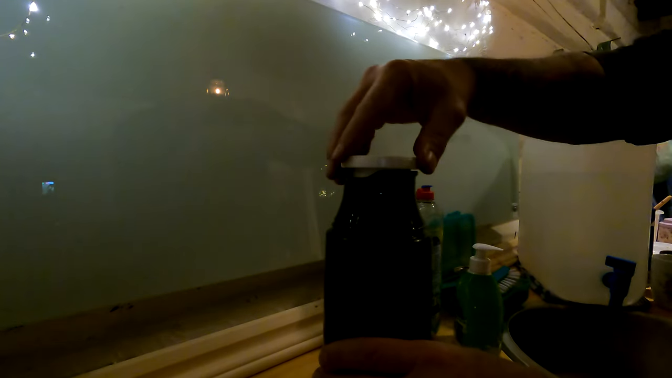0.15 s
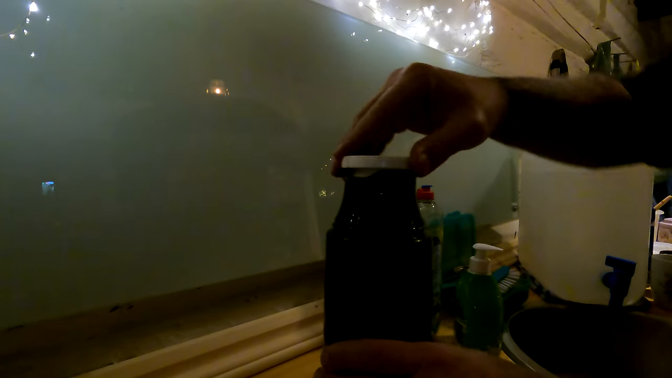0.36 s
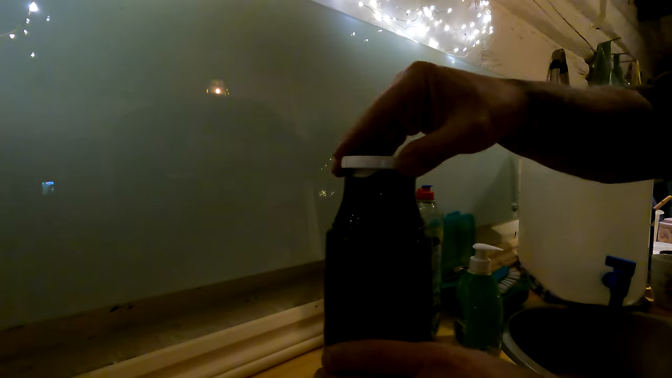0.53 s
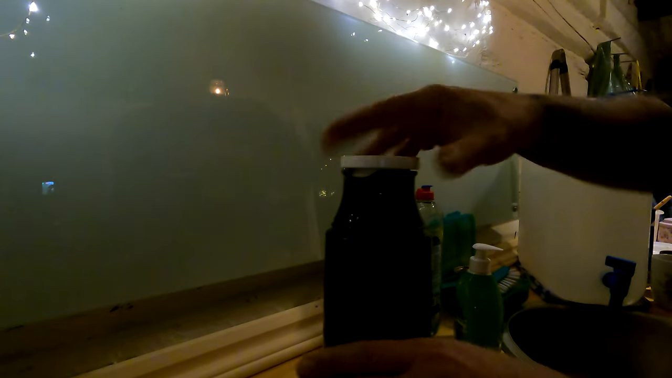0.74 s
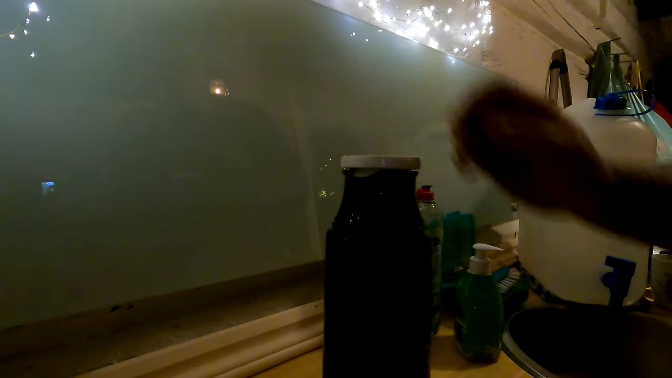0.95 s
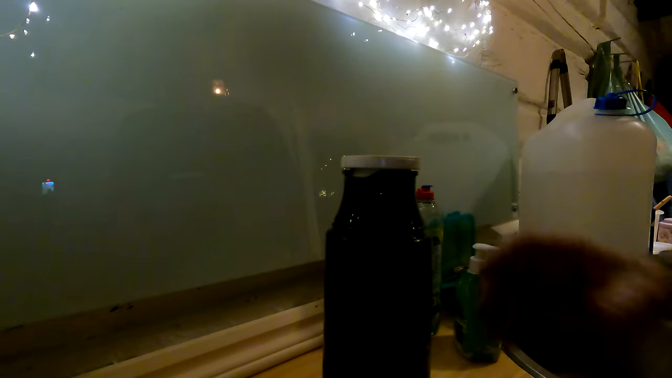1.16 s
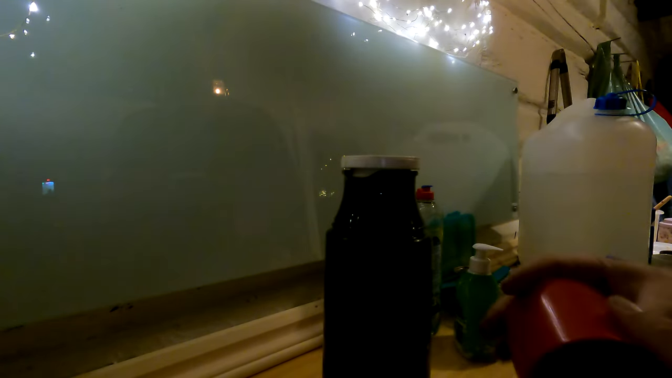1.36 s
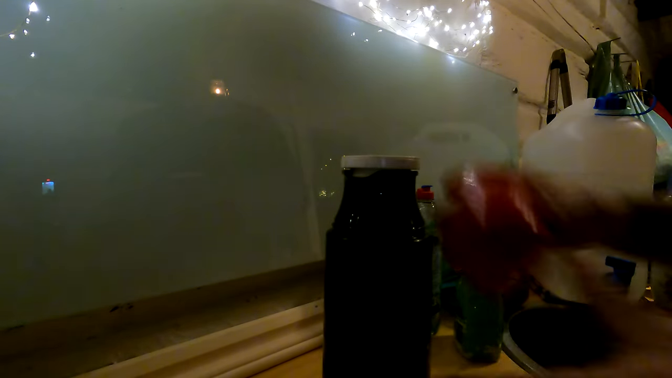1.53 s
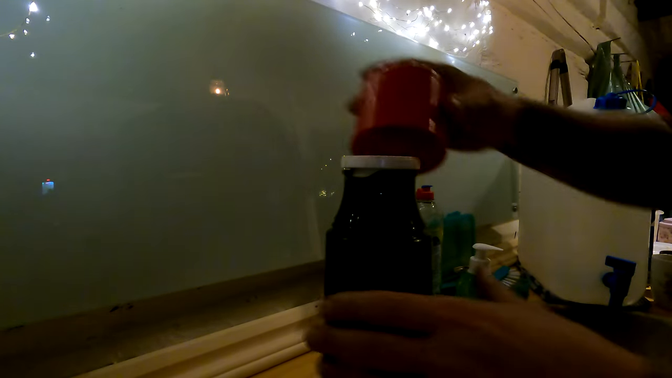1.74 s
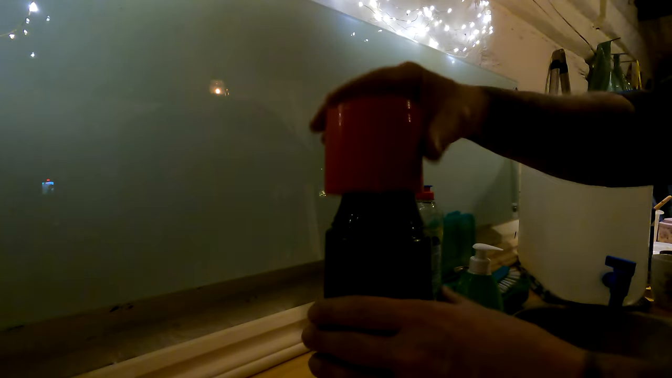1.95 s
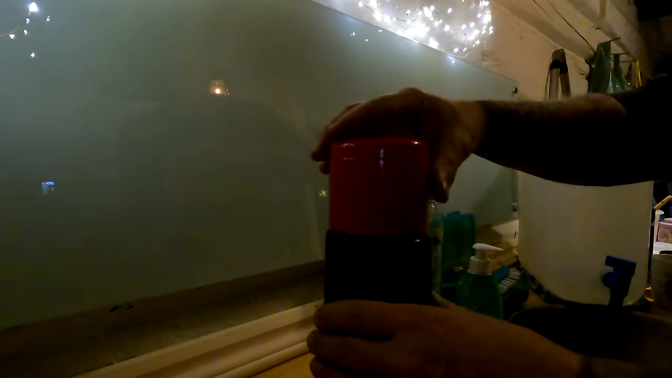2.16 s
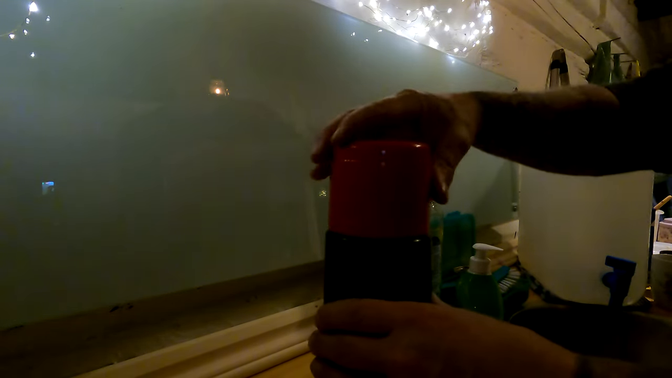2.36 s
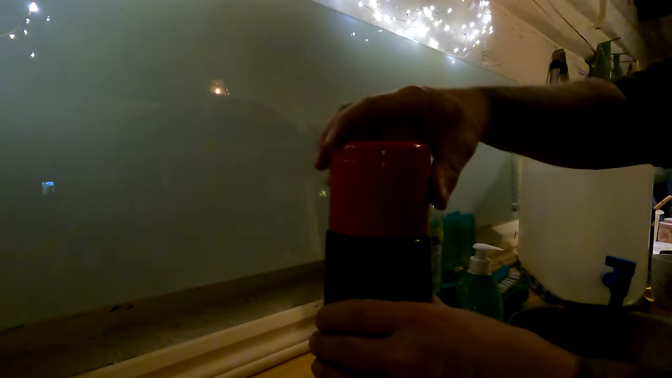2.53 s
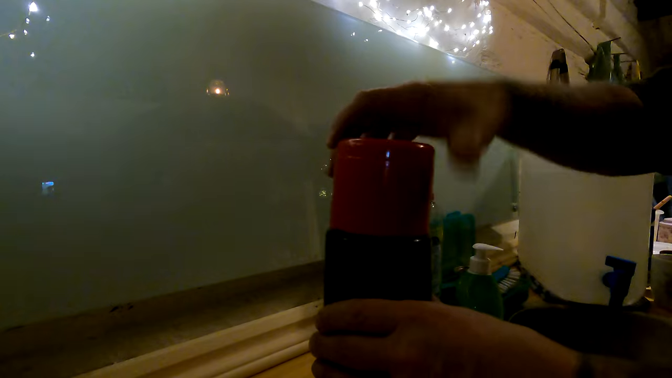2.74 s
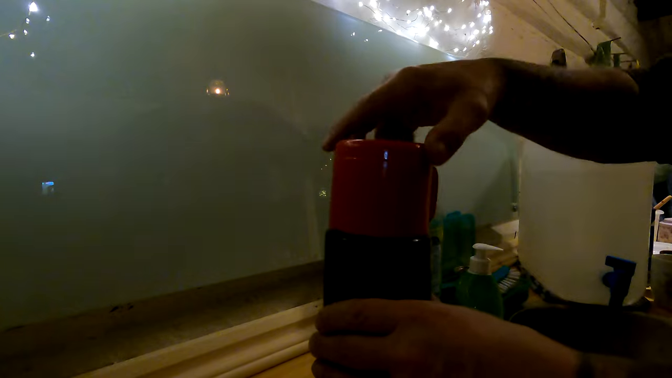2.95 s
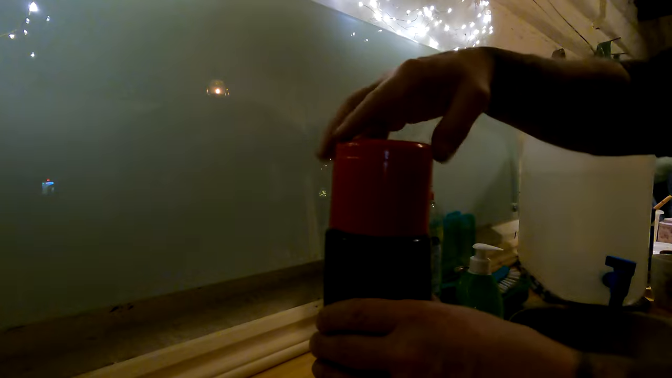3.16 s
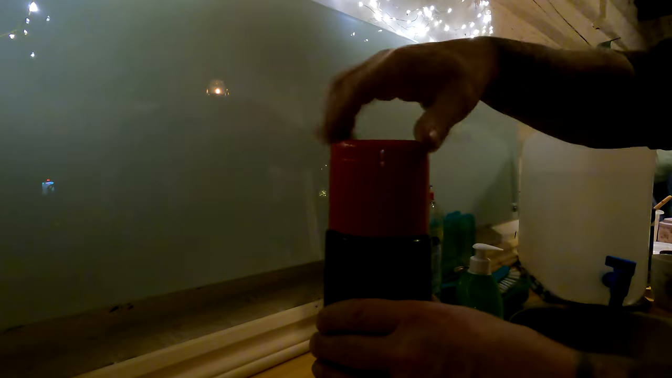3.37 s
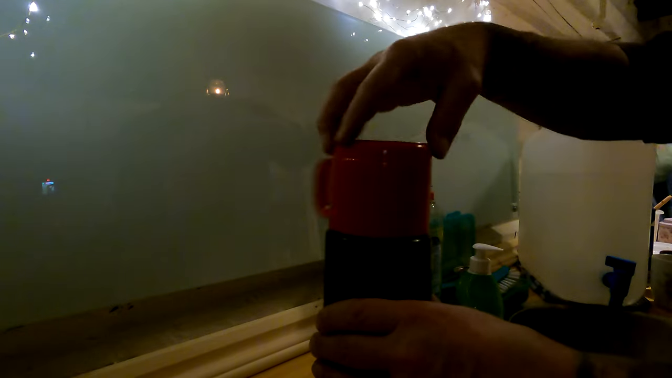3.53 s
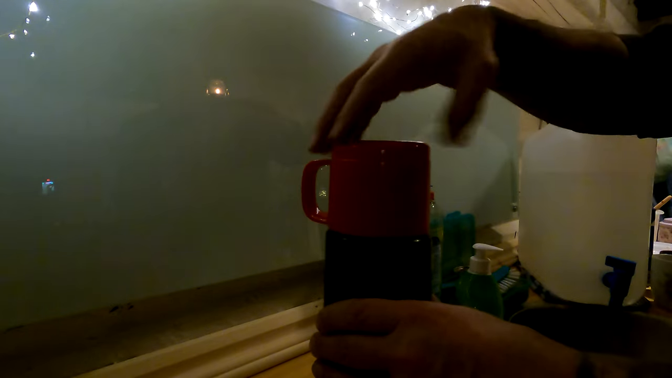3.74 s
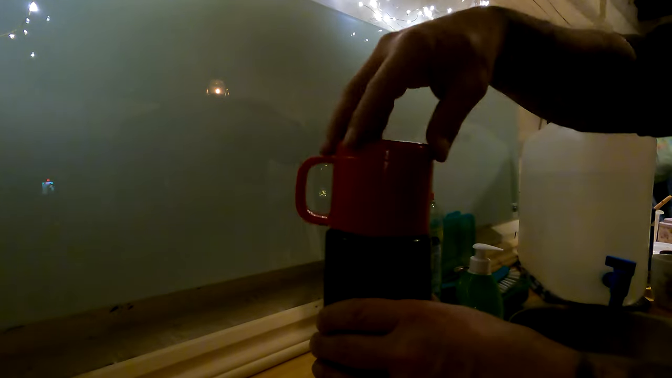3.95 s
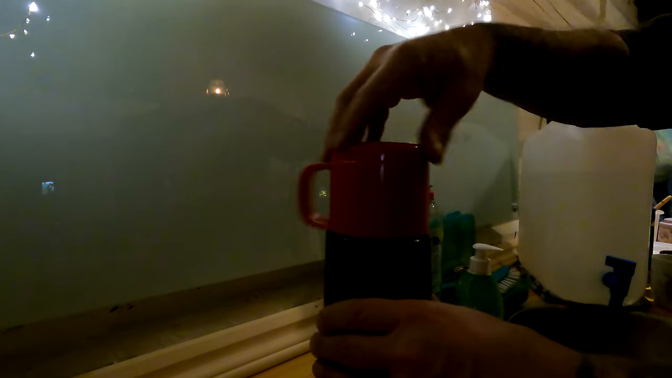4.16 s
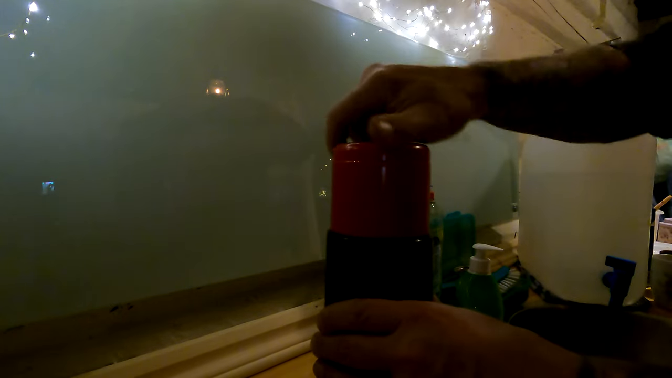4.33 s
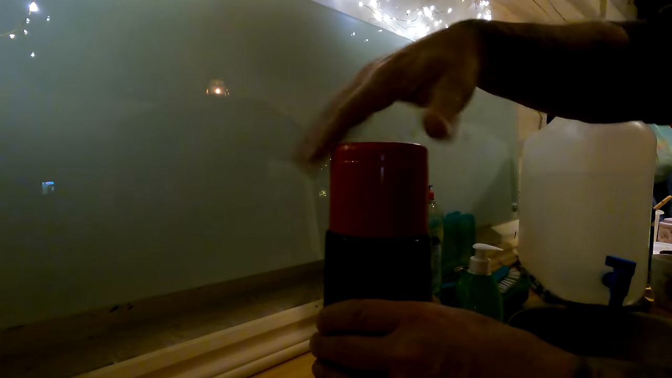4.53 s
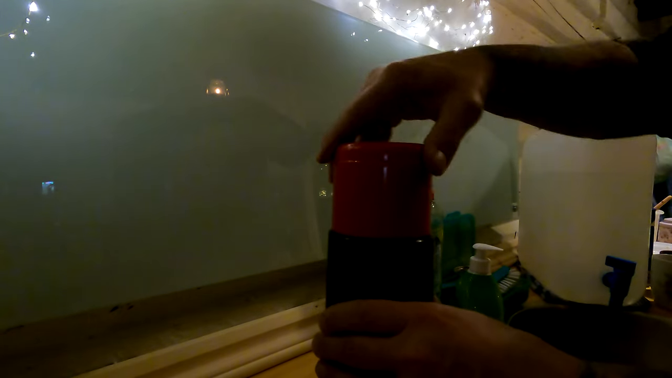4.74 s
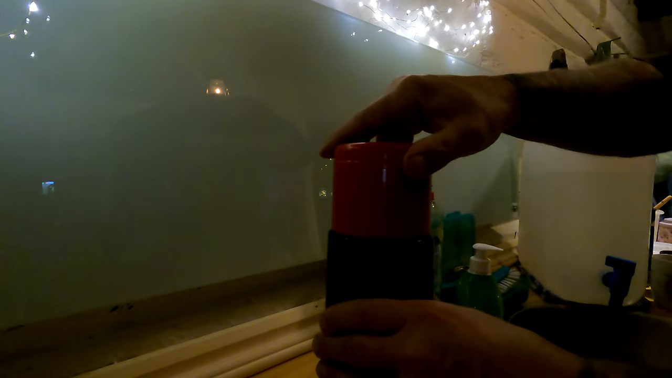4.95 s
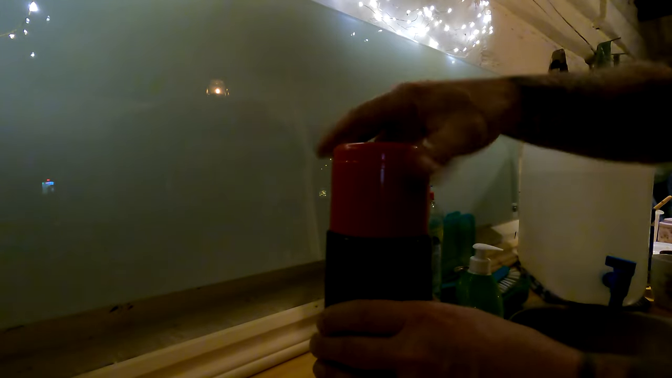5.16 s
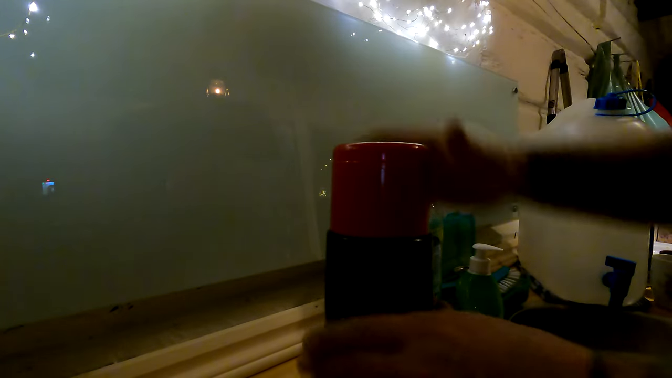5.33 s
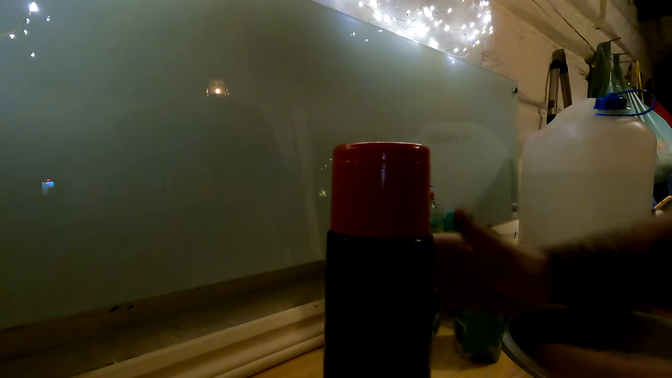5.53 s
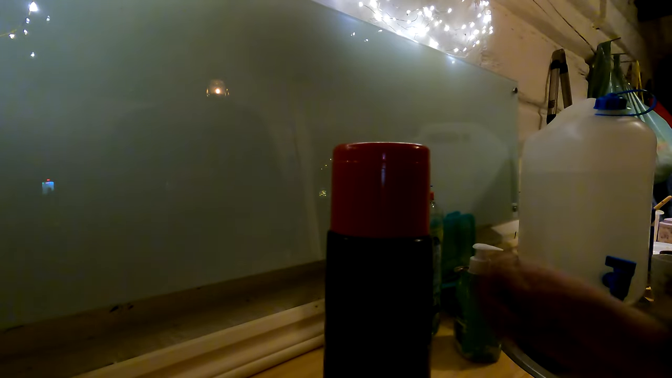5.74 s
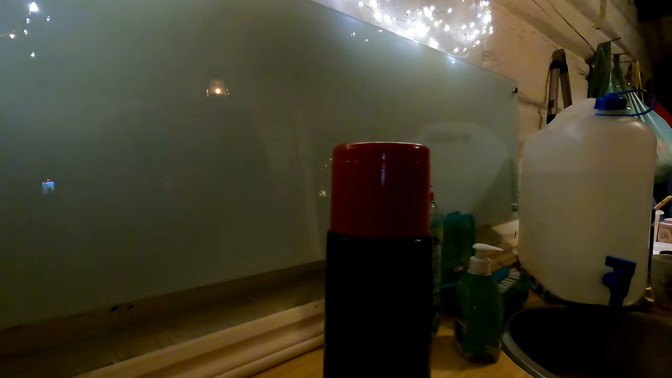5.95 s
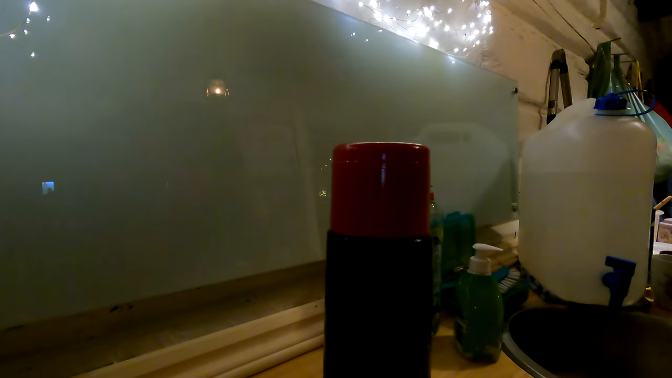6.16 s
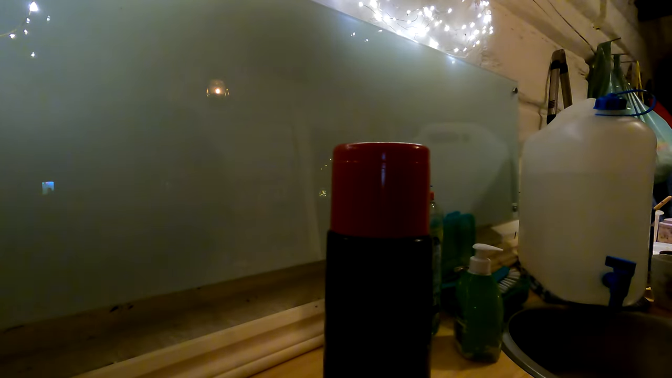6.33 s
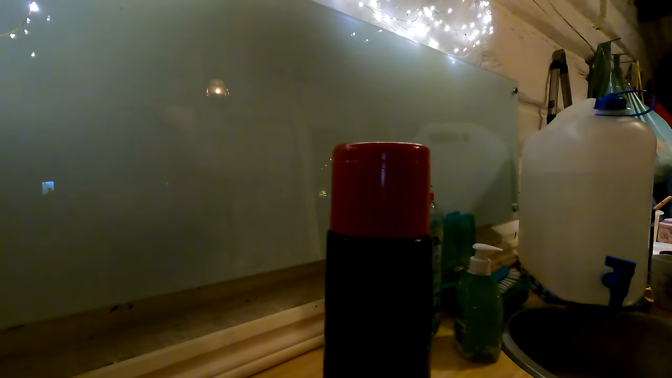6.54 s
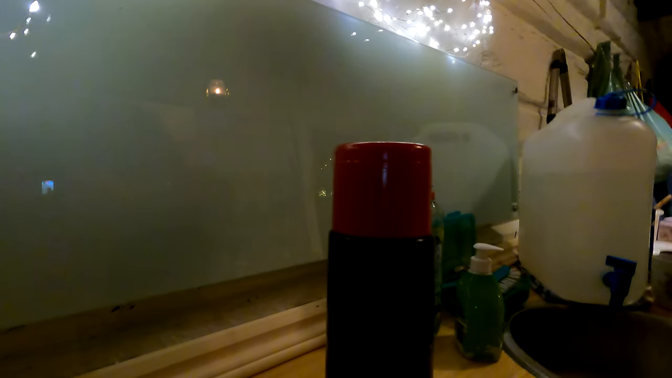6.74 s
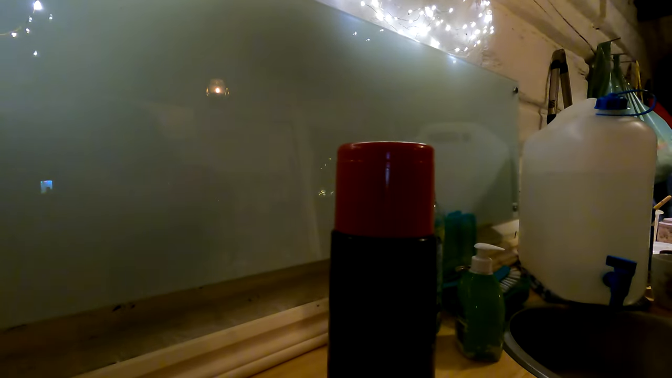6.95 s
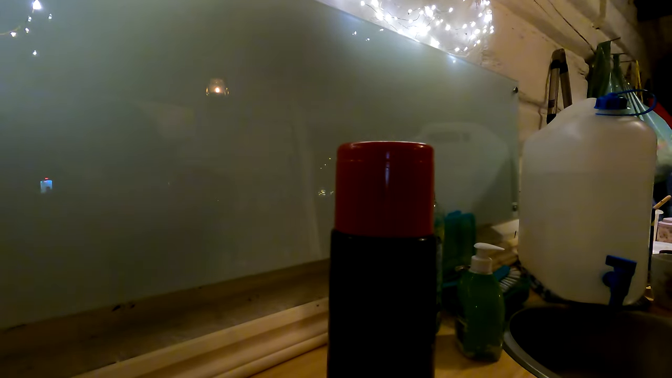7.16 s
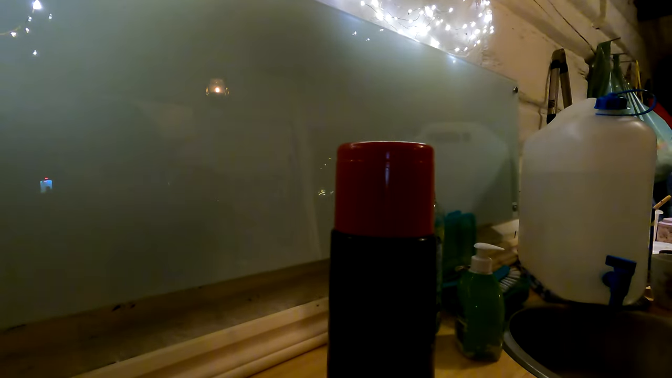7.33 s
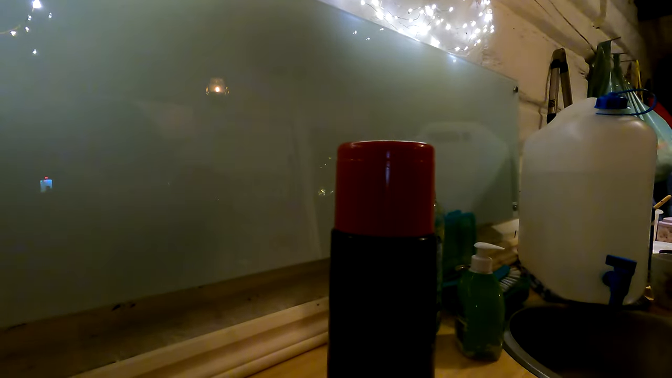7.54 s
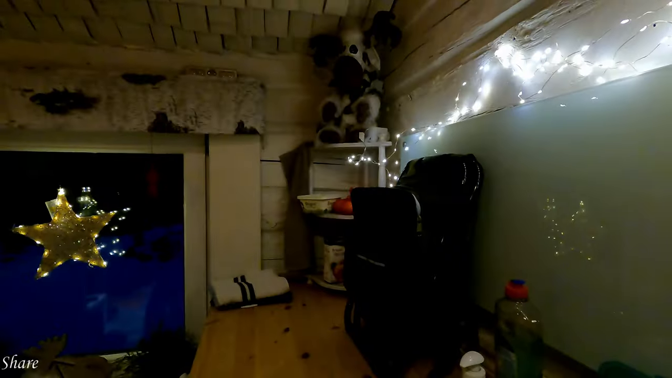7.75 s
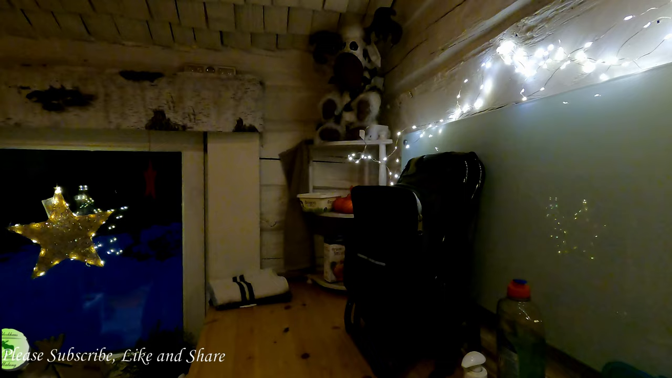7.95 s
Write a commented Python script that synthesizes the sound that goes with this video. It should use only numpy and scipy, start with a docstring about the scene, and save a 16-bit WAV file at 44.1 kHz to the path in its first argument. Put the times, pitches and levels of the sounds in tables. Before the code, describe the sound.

A faint rubbery rub and soft skin brushes come first as a stopper is tightened. A hollow plastic cup then lands with a rattling cluster of knocks and is twisted on in short gritty scrapes, the loudest clacks midway. Low thumps travel through the counter to a close stereo microphone. Afterwards come dull bumps, a humming finger on the microphone's housing, and a brief silence.

```python
"""A plastic cup is screwed onto a vacuum flask on a kitchen counter, after fingers tighten the stopper.
Cup knocks are a short wall swing, ringing modes, chatter and a crack; the thread scrapes in noisy slips.
Knocks and pushes also reach a microphone on the counter as low thumps made of decaying sine waves.
Bumps of filtered noise, and a finger humming and hissing on the microphone's housing, come as well.
Noise gives the room rumble and hiss; a short silence falls just before the end."""
import sys
import numpy as np
from scipy import signal
from scipy.fft import rfft, irfft, next_fast_len
from scipy.io import wavfile
from scipy.ndimage import uniform_filter1d

SR = 44100
rng = np.random.default_rng(int(sys.argv[2]) if len(sys.argv) > 2 else 0)


def transcribe(signal):
    """Save signal, clipped to [-1, 1], as a 16-bit WAV file at the path in sys.argv[1]."""
    frames = np.atleast_2d(signal).T
    limited = np.clip(frames, -1, 1)
    pcm = np.round(limited * 32767).astype(np.int16)
    wavfile.write(sys.argv[1], SR, pcm)


N = 352344
T = np.arange(N) / SR  # time in seconds
RING_T = T[:SR // 2]  # the half second allowed for each blow

# Blows on the cup and the stopper, and a click (at 7.453 s) as a finger meets the microphone's housing.
# Each row: start in seconds, body level in dB, wall swing in Hz, crack level in dB,
# level in dB of the thud through the counter.
KNOCKS = [(0.808, -22.5, 630, -39, -17.5), (1.097, -35.5, 540, -76, -44), (1.469, -54, 860, -59, -43.5),
          (1.52, -46, 890, -77, -63), (1.67, -47.5, 864, -60.5, -60), (2.023, -22.5, 950, -43.5, -31.5),
          (2.157, -14.5, 805, -29.5, -39), (2.163, -0.5, 787, -32, -20.5), (2.176, -10, 960, -32, -22),
          (2.186, -7, 620, -27.5, -30.5), (2.321, -2.5, 859, -43, -17), (2.584, -34, 520, -61.5, -30),
          (2.793, -5.5, 920, -40.5, -17), (2.845, -13.5, 880, -59, -25.5), (2.894, -9.5, 692, -38.5, -26),
          (2.974, -18.5, 670, -50, -37), (2.994, -18, 363, -55, -39), (3.112, -33.5, 600, -58, -62),
          (3.126, -27, 342, -56, -39), (3.161, -13, 345, -53, -36.5), (3.177, -11.5, 382, -38, -17.5),
          (3.276, -24, 650, -47, -42), (3.284, -12.5, 964, -41, -33), (3.293, -18.5, 372, -46.5, -35),
          (3.469, -31, 700, -58, -32), (3.511, -3.5, 690, -55, -19.5), (3.623, -15, 880, -54, -17),
          (3.716, -8, 732, -34, -26), (3.937, 3, 877, -22, -16), (3.944, -2, 1030, -33.5, -3.5),
          (4.002, -15.5, 676, -38, -26), (4.075, -12.5, 784, -44.5, -33), (4.1, 4.5, 1055, -18, -1),
          (4.268, -24, 650, -53, -38), (4.345, -22.5, 1300, -49, -34), (4.406, -26, 500, -47.5, -23.5),
          (4.479, -30, 1500, -54, -47), (4.505, -25.5, 1400, -47, -46), (4.54, -31.5, 1400, -54.5, -46),
          (4.906, -4, 1025, -34.5, -13.5), (4.934, 2, 974, -26.5, -6), (5.265, -34.5, 700, -58, -24),
          (5.291, -39, 1245, -52, -38), (5.328, -59, 1300, -59.5, -56), (5.407, -25, 635, -42.5, -30.5),
          (7.453, -60, 1400, -56, -70), (7.967, -38.5, 1170, -82.5, -48)]
# Twists of the cup along its thread. Each row: start in seconds, length in seconds, scrape level in dB.
TWISTS = [(1.994, 0.072, -52), (2.289, 0.09, -45), (2.585, 0.22, -40.5), (2.88, 0.091, -47.5),
          (3.106, 0.18, -44), (3.474, .28, -44.5), (3.916, 0.096, -36), (4.07, 0.09, -37.5),
          (4.235, 0.048, -33.5), (4.314, 0.072, -33), (4.899, 0.1, -39)]
# Ringing tones of the cup. Each row: pitch in Hz, level in dB, seconds to fall by 60 dB.
CUP_MODES = [(308, -9, .15), (334, -3.5, 0.044), (397.8, -2.5, .09), (529.5, -4, 0.14), (592.4, -5.5, 0.13),
             (700, 3, 0.055), (814, -9.5, 0.026), (937.6, 1.5, 0.12), (1026, -0.5, 0.09), (1093, -7, 0.1),
             (1255, -18.5, 0.091), (1373, -10.5, 0.13), (1754, -14.5, 0.057), (1732, -21, 0.25),
             (2060, -23, .2), (2270, -19.5, .08), (2310, -18, 0.083), (2551, -19.5, 0.033),
             (3079, -17.5, 0.033), (2960, -25, 0.04), (3607, -20, 0.069), (3820, -20.5, .08),
             (4240, -29.5, 0.037), (5000, -27, 0.058)]
# Tone colour of the low rumble under a hand. Each row: pitch in Hz, level in dB.
RUMBLE_COLOUR = [(20, -3.5), (45, 8.5), (75, 7.5), (110, -12.5), (180, -6.5), (260, -21.5), (450, -31),
                 (900, -64.5)]


def undb(db):
    """Turn decibels into a gain."""
    return 10 ** (np.asarray(db) / 20)


def unit(x, top=False):
    """Scale to an rms of 1, or to a peak of 1."""
    size = np.abs(x).max() if top else x.std()
    return x / size


def colour(x, points):
    """Filter with a response of (Hz, dB) points; it never sounds before its input."""
    size = next_fast_len(len(x) + 4096, True) // 2 * 2
    hz, db = np.transpose(points)
    f = np.maximum(np.arange(size // 2 + 1) * SR / size, 1)
    log_gain = np.interp(np.log(f), np.log(hz), db) * np.log(10) / 20
    # folding the cepstrum forward in time gives the filter its minimum phase
    cepstrum = irfft(log_gain)
    cepstrum[1:size // 2] *= 2
    cepstrum[size // 2 + 1:] = 0
    response = np.exp(rfft(cepstrum))
    return irfft(rfft(x, size) * response)[:len(x)]


def fade(t60):
    """Exponential decay after a blow, falling 60 dB in t60 seconds."""
    return undb(-60 * RING_T / max(t60, 1e-3))


def burst(t60):
    """Dying noise: many tiny contacts or wall reflections."""
    return rng.standard_normal(len(RING_T)) * fade(t60)


def ring(modes, scatter_db):
    """Decaying tones of a struck body; each blow lands elsewhere and weights them anew."""
    out = np.zeros(len(RING_T))
    for hz, db, t60 in modes:
        level_chance, pitch_chance = rng.uniform(-1, 1, 2)
        gain = undb(db + scatter_db * level_chance) * np.sign(pitch_chance)
        tone = np.sin(2 * np.pi * hz * (1 + 0.009 * pitch_chance) * RING_T)
        out += gain * fade(t60) * tone
    return out


def add(track, s, x):
    """Mix a sound into the track at time s in seconds."""
    i = max(int(s * SR), 0)
    track[..., i:i + x.shape[-1]] += x[..., :N - i]


def pan(x, db):
    """Place a sound by its left minus right level in dB."""
    return x * undb(np.array([[db], [-db]]) / 2)


def grains(rate, spread_db):
    """Stick-slip clicks of uneven size at a given rate per second, rms 1."""
    clicks = (rng.random(N) < rate / SR) * rng.standard_normal(N)
    return unit(clicks * undb(abs(spread_db) * rng.exponential(size=N)))


def walk(rate):
    """Random values at a given rate per second, held and smoothed; their spread is near 1."""
    k = int(SR / rate)
    steps = np.repeat(rng.standard_normal(N)[:N // k + 1], k)
    return unit(uniform_filter1d(steps, k)[:N])


def strokes(rows, attack_s, release_s):
    """Gain of (s, length s, dB) hand movements: each swells, holds, then falls 60 dB in the release."""
    out = np.zeros(N)
    for s, length_s, db in rows:
        t = T[T < length_s + release_s]
        swell = np.minimum(t / attack_s, 1) ** 2
        fall = np.exp(-np.log(1000) * np.maximum(t - length_s, 0) / release_s)
        add(out, s, swell * undb(db) * fall)
    return out


def knock(body_db, hz, crack_db, swing_cycles=7.2, rise_s=0.00059):
    """The gripped wall swings a few cycles, the cup rings and chatters on, the hard rim cracks."""
    # Tone colour of the chatter. Each row: pitch in Hz, level in dB.
    chatter_colour = [(100, -24.5), (250, -12.5), (500, -4), (950, 5.5), (1500, -3), (2500, -13),
                      (5000, -41.5), (12000, -58)]
    # Tone colour of the rim's crack. Each row: pitch in Hz, level in dB.
    crack_colour = [(300, -20), (900, 2), (2000, 7.5), (3600, 1.5), (5500, -1), (8000, -10.5), (12000, -23),
                    (16000, -28)]
    swing = np.sin(2 * np.pi * hz * RING_T) * fade(swing_cycles / hz)  # falls 60 dB in these cycles
    swing = unit(swing * (1 - np.exp(-RING_T / rise_s)), top=True)
    modes = unit(ring(CUP_MODES, scatter_db=5.5), top=True)
    chatter = unit(colour(burst(t60=0.044), chatter_colour), top=True)
    body = unit(swing + undb(-6.5) * modes + undb(-5.0) * chatter, top=True)

    crack = burst(t60=0.0065) + undb(-17.5) * burst(t60=0.047)
    crack = colour(crack * (1 - np.exp(-RING_T / 0.001)), crack_colour)
    crack *= undb(crack_db + 2.5) / crack[:SR // 50].std()  # level over the first 20 ms
    return undb(body_db + 0.6) * body + crack


def knocks(lag_s=0.0018, graze_db=-15, graze_t60_s=0.05):
    """Blows on cup and stopper, and a click on the housing; the parts graze just before they meet."""
    out = np.zeros(N)
    for s, body_db, hz, crack_db, _ in KNOCKS:
        blow = knock(body_db, hz, crack_db)
        graze = burst(graze_t60_s)[:SR // 50][::-1]  # 20 ms of noise that grows towards the blow
        lead = signal.fftconvolve(blow, graze / np.linalg.norm(graze))
        add(out, s + lag_s, blow)
        add(out, s + lag_s - len(graze) / SR, undb(graze_db) * lead)
    return out


def ticks(ticks_per_s=14, body_db=9.5, crack_db=-15, spread_db=2, middle_hz=845):
    """The loose cup wobbles on its thread and ticks at random, harder in a harder twist."""
    out = np.zeros(N)
    for s, length_s, scrape_db in TWISTS:
        for _ in range(round(ticks_per_s * length_s)):
            size_db = scrape_db + spread_db * rng.uniform(-1, 1)
            hz = middle_hz * 2 ** rng.uniform(-1, 1)  # up to an octave either way
            tick = knock(size_db + body_db, hz, size_db + crack_db)
            add(out, s + length_s * rng.random(), tick)
    return out


def thread_scrape():
    """The thread catches and slips: many slips grate, and sparser hard ones ring the whole cup."""
    # Tone colour of the grating thread. Each row: pitch in Hz, level in dB.
    thread_colour = [(150, -32.5), (250, 2), (342, 4), (443, -12), (661, 0), (786, -5), (888, -6.5),
                     (1350, 0.5), (1600, -14), (2040, -1.5), (2700, -11.5), (5400, -12.5), (12000, -31.5),
                     (15900, -57)]
    twist = strokes(TWISTS, attack_s=.035, release_s=.2)
    slips = grains(rate=12000, spread_db=1.1) * undb(1.8 * walk(rate=60)) * twist
    click = 1. * (RING_T == 0)
    grating = colour(slips, thread_colour) / np.linalg.norm(colour(click, thread_colour))
    catches = grains(rate=810, spread_db=1) * twist
    cup_ring = ring(CUP_MODES, scatter_db=-8.5)
    ringing = signal.fftconvolve(catches, cup_ring / np.linalg.norm(cup_ring))[:N]
    return undb(-2.0) * (grating + undb(-4.5) * ringing)


def seal():
    """The stopper's rubber seal drags in the neck of the flask in small slips, swelling with the turn."""
    # Rubs of the seal. Each row: start in seconds, length in seconds, level in dB.
    rubs = [(0.27, .15, -55), (0.5, 0.11, -70)]
    # Tone colour of the rubbing seal. Each row: pitch in Hz, level in dB.
    seal_colour = [(500, -25), (900, -14), (1130, 5.5), (1450, -4), (1900, -6), (2500, -18), (4200, -19),
                   (7000, -40), (14000, -51)]
    rubbing = unit(colour(grains(rate=2500, spread_db=1.5), seal_colour))
    return rubbing * strokes(rubs, attack_s=0.098, release_s=0.22)


def finger_brushes():
    """Skin slides over the plastic in tiny slips, heard as a fine hiss."""
    # Brushes of the fingers. Each row: start in seconds, length in seconds, level in dB.
    brushes = [(0.0, 0.062, -51.5), (0.745, 0.071, -50.5), (1.065, 0.036, -50), (1.43, 0.1, -69.5),
               (1.65, 0.055, -65.5), (4.765, 0.038, -48), (5.365, 0.04, -44.5), (5.51, .03, -61)]
    # Tone colour of sliding skin. Each row: pitch in Hz, level in dB.
    skin_colour = [(210, -30.5), (350, -19), (527, -4.5), (780, -15), (1100, -6), (1530, -16), (1770, -14),
                   (6420, -20), (12600, -39), (15000, -55)]
    hiss = unit(colour(grains(rate=2500, spread_db=-1.9), skin_colour))
    return undb(1.5) * hiss * strokes(brushes, attack_s=0.014, release_s=0.13)


def thump(hz, t60, rise_cycles=0.6, boards_db=-9):
    """The flask rocks on the counter as a decaying low tone, and the boards ring with it."""
    # Ringing tones of the counter. Each row: pitch in Hz, level in dB, seconds to fall by 60 dB.
    counter_modes = [(48, -6, 0.14), (60, -3, 0.13), (93.5, -2.5, .25), (113.5, -4, 0.17),
                     (156.4, -7.5, 0.26), (189, -8.5, 0.23), (220.8, -8.5, 0.16)]
    push = 1 - np.exp(-(RING_T * hz / rise_cycles) ** 2)
    rock = unit(push * np.sin(2 * np.pi * hz * RING_T) * fade(t60), top=True)
    boards = unit(push * ring(counter_modes, scatter_db=0.0), top=True)
    return rock + undb(boards_db) * boards


def counter(thud_hz=171, thud_t60_s=0.051, thud_lag_s=.003, rock_cycles=11):
    """Knocks thud through the counter, pushes rock it more slowly, and gripping hands add a rumble."""
    # The hands bear down on the flask. Each row: start in seconds, length in seconds, rumble level in dB.
    grips = [(0.0, 0.53, -49.5), (0.72, 0.37, -38), (2.12, 0.77, -50), (2.98, 0.3, -37), (3.47, 0.84, -40),
             (3.9, 0.58, -32), (4.63, 0.82, -41), (6.06, 0.046, -36)]
    # Pushes that rock the flask. Each row: start in seconds, level in dB, rocking pitch in Hz.
    pushes = [(0.005, -30, 45.4), (0.186, -23.5, 60), (0.816, -17.5, 69.3), (0.855, -21, 53.3),
              (0.962, -19.5, 62.7), (1.082, -20.5, 70.5), (2.175, -13.5, 77.3), (2.33, -24, 72),
              (2.65, -34.5, 70.6), (2.997, -30.5, 61.4), (3.059, -29, 48), (3.295, -24, 56),
              (3.495, -15.5, 63.5), (3.718, -15.5, 67.6), (3.94, -11.5, 76), (4.119, -5.5, 48),
              (4.409, -22, 60.5), (4.675, -21.5, 55.16), (4.728, -21, 63.2), (4.907, -7.5, 76.2),
              (4.926, -5, 68.7), (5.225, -27, 63), (5.271, -19.5, 67.6), (5.407, -19.5, 63),
              (5.518, -32.5, 54)]
    rumble = unit(colour(rng.standard_normal(N), RUMBLE_COLOUR))
    out = rumble * strokes(grips, attack_s=.03, release_s=0.51)
    for s, *_, thud_db in KNOCKS:
        hz = thud_hz * (1 + 0.073 * rng.uniform(-1, 1))
        add(out, s + thud_lag_s, undb(thud_db) * thump(hz, thud_t60_s))
    for s, db, hz in pushes:
        add(out, s, undb(db) * thump(hz, rock_cycles / hz))  # falls 60 dB in these cycles
    return out


def finger_drags(drag_hz=151):
    """A finger judders along the microphone's housing, making it hum, while its skin hisses."""
    # Drags near the right port. Each row: start in seconds, length in seconds, hum level in dB,
    # hiss level in dB.
    drags = [(6.11, .08, -61, -58.5), (6.822, 0.086, -39, -53), (7.1, 0.11, -48.5, -62),
             (7.194, 0.05, -37.5, -66.5), (7.351, 0.11, -46, -71)]
    # Tone colour of skin close to the microphone. Each row: pitch in Hz, level in dB.
    near_skin_colour = [(300, 1), (1000, -1.5), (2300, 0), (4000, -4.5), (7000, -5.5), (10000, -18.5),
                        (16000, -37)]
    hum_rows = [(s, length_s, hum_db) for s, length_s, hum_db, _ in drags]
    hiss_rows = [(s, length_s, hiss_db) for s, length_s, _, hiss_db in drags]

    wobbling_hz = drag_hz * (1 + .06 * walk(rate=35))
    judder = np.sin(2 * np.pi * np.cumsum(wobbling_hz) / SR) * undb(2.8 * walk(rate=20))
    hum = unit(judder) + undb(-4.5) * unit(colour(rng.standard_normal(N), RUMBLE_COLOUR))
    hum *= strokes(hum_rows, attack_s=0.02, release_s=0.29)
    hiss = unit(colour(grains(rate=9100, spread_db=-2.8), near_skin_colour))
    hiss *= strokes(hiss_rows, attack_s=0.02, release_s=0.29)
    return pan(hum, db=-10) + pan(hiss, db=-6.5)


def housing_press(press_s=7.463, press_db=-23):
    """A finger presses on the microphone's housing, which rings in a few low tones."""
    # Ringing tones of the housing. Each row: pitch in Hz, level in dB, seconds to fall by 60 dB.
    housing_modes = [(48, -0.5, 0.5), (96.5, 3, 0.31), (146.2, -1.5, 0.41)]
    out = np.zeros((2, N))
    press = unit(ring(housing_modes, scatter_db=5.5), top=True)
    add(out, press_s, pan(undb(press_db) * press, db=-7))
    return out


def dull_bumps():
    """Dull bumps of hand and forearm, and two thuds on the microphone's housing off to the right: short noise
    bursts, muffled by a low-pass filter."""
    # The bumps. Each row: start in seconds, level in dB, muffling cut-off in Hz, left minus right in dB.
    bumps = [(0.005, -43, 1800, -0.5), (0.043, -38, 1840, -0.5), (0.187, -39.5, 600, 0.5),
             (0.759, -29, 250, 0), (0.922, -33.5, 197, 0.5), (0.962, -44, 198, 4), (1.079, -25.5, 860, 1),
             (5.27, -29.5, 600, 2.5), (5.399, -34, 950, 3), (6.034, -22.5, 1700, 2),
             (6.065, -24, 1400, 3.5), (6.85, -23.5, 299, -8.5), (6.889, -29, 279, -10.5)]
    # Tone colour before muffling. Each row: pitch in Hz, level in dB.
    bump_colour = [(30, 8), (70, -10), (140, 6), (280, -5.5), (420, -10.5), (560, -11.5), (800, -22),
                   (1350, -16), (2400, -26.5), (5000, -38)]
    out = np.zeros((2, N))
    for s, db, cutoff_hz, pan_db in bumps:
        muffle = signal.butter(2, cutoff_hz, fs=SR, output="sos")
        bump = signal.sosfilt(muffle, colour(burst(t60=0.16), bump_colour))
        add(out, s, pan(undb(db) * unit(bump, top=True), pan_db))
    return out


def kitchen(x, width_hz=1800):
    """A small, short room; the two close ports hear its bass alike and its treble less so."""
    # Room echo by band. Each row: centre in Hz, level in dB, seconds to fall by 60 dB.
    echo_bands = [(288, -4.5, 0.31), (600, -14, .22), (1400, -18.5, 0.28), (3360, -14, .22),
                  (7000, -28.5, 1), (13000, -15, 0.28)]
    response = 0
    for hz, db, t60 in echo_bands:
        band = signal.butter(2, [hz / 1.5, min(hz * 1.5, .45 * SR)], "band", fs=SR, output="sos")
        onset = 1 - np.exp(-(RING_T / 0.00063) ** 2)
        mid, side = (signal.sosfilt(band, burst(t60) * onset) for _ in range(2))
        width = np.sqrt(hz / (hz + width_hz))
        tail = mid + width * side * np.array([[1], [-1]])
        response = response + undb(db) * tail / np.linalg.norm(fade(t60))
    return x + signal.fftconvolve(x[None], response, axes=1)[:, :N]


def ports(x, lag_s=.000014):
    """Airborne sound reaches the right port a little before the left."""
    hz = np.arange(N // 2 + 1) * SR / N
    turn = np.exp(np.pi * 1j * hz * lag_s * np.array([[-1], [1]]))
    return irfft(rfft(x) * turn, N)


def quiet(level_db=-64):
    """Steady noise: still room rumble in the middle, microphone hiss out to the sides."""
    # Tone colour of the quiet room. Each row: pitch in Hz, level in dB.
    quiet_colour = [(20, -4), (42, 0), (85, -9), (175, -4), (300, -10), (630, -18), (1300, -19),
                    (2500, -25), (6500, -26), (8000, -30), (10000, -38), (13000, -42), (16000, -58)]
    mid, side = (unit(colour(rng.standard_normal(N), quiet_colour)) for _ in range(2))
    side = signal.sosfilt(signal.butter(1, 1200, "high", fs=SR, output="sos"), side)
    return undb(level_db) * (mid + undb(-1.5) * side * np.array([[1], [-1]]))


def scene():
    """Airborne sounds pass through the room; thumps and handling reach the microphone directly."""
    airborne = knocks() + ticks() + thread_scrape() + seal() + finger_brushes()
    handling = finger_drags() + housing_press() + dull_bumps()
    return ports(kitchen(airborne)) + counter() + handling + quiet()


def record(dry, top_hz=15500):
    """Hard knocks overload the microphone; the sound is cut to silence near the end; top treble is cut."""
    # The silent gap: its start and end in seconds.
    silence = (7.605, 7.93)
    outside = (T < silence[0]) | (T > silence[1])
    live = uniform_filter1d(1. * outside, size=200)  # soft edges of about 5 ms
    clipped = np.clip(dry * live, -1, 1)
    low_pass = signal.ellip(8, .2, 70, top_hz, fs=SR, output="sos")
    return signal.sosfilt(low_pass, clipped)


dry = scene()
out = record(dry)
transcribe(out)
```